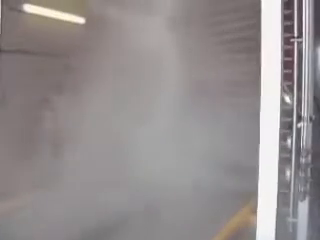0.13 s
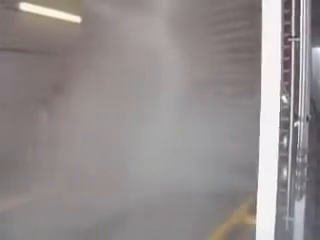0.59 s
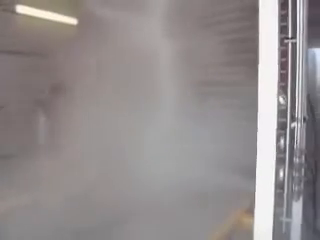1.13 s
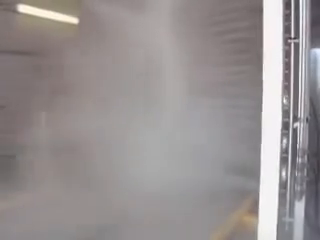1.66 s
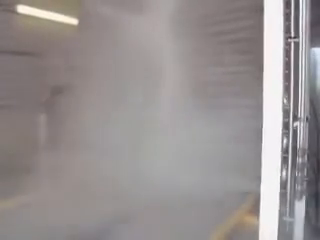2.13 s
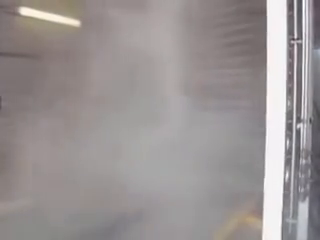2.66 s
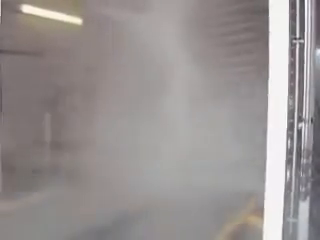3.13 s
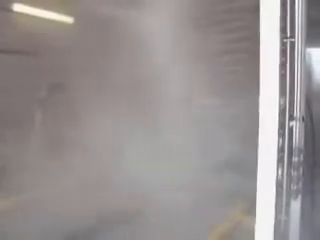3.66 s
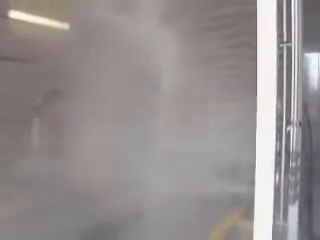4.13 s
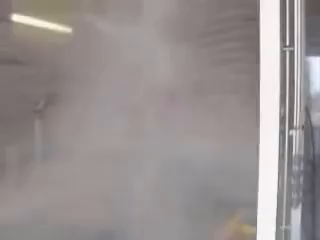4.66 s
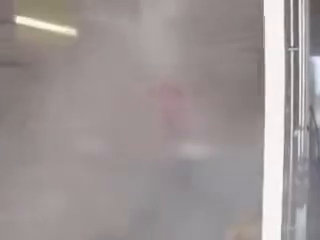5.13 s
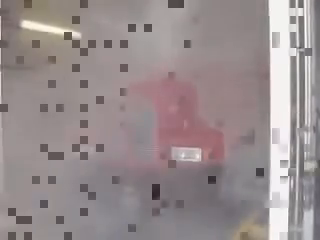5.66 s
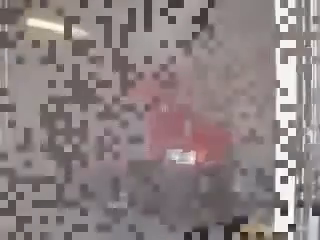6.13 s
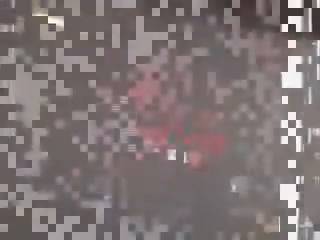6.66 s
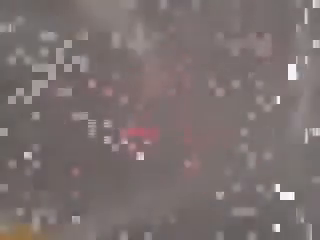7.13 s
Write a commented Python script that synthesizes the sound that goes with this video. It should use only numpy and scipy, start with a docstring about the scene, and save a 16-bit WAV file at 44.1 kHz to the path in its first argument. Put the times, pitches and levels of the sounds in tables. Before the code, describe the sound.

A continuous high-pressure spray runs for about 7.3 seconds in a hard-walled wash bay, already at full strength at the start. Low roar, dense rushing jets and a flickering hiss blend into one broad noise, with small swells around 0.1, 0.3, 1.4 and 3.5 s. Brief spits flare in the hiss, notably near 0.7, 2.7, 3.6 and 6.7 s. Behind it a weak, wavering pump hum of several low tones is clearest from about 1 to 3.5 s, then recedes and nearly vanishes after 6 s. Soft muffled thumps pulse irregularly underneath throughout. From 3 to 5.5 s the spray turns slightly thinner and hissier; after about 5.8 s it eases by a few decibels, with a low swell near 7.1 s, and stops while still spraying. The image is nearly centred, with fleeting wide patches of hiss, slightly smeared mids and a closed-off top.

```python
"""A low roar with hiss above it fills a hard-walled wash bay, where high-pressure nozzles spray a vehicle.
Roar, jets and hiss are noise cut into bands that waver on their own; spits and swells lift parts of it.
A pump hums faintly as a few unsteady tones, and soft low thumps are short bursts of a low tone.
Towards the end the spray eases off. Left and right match, except in brief patches of the hiss."""
import sys
import numpy as np
from scipy import signal
from scipy.fft import rfft, irfft
from scipy.io import wavfile
from scipy.ndimage import uniform_filter1d

SR = 44100
rng = np.random.default_rng(int(sys.argv[2]) if len(sys.argv) > 2 else 0)


def output_pcm(signal):
    """Save a mono or channel-first signal as 16-bit PCM at the path in sys.argv[1].

    Samples are clipped to [-1, 1] before scaling.
    """
    pcm = np.clip(np.atleast_2d(signal).T, -1, 1) * 32767
    wavfile.write(sys.argv[1], SR, np.round(pcm).astype(np.int16))


def elevation(decibels):
    """Turn decibel levels (scalar or array-like) into linear amplitude ratios."""
    levels = np.asarray(decibels, float)
    return 10 ** (levels / 20)


N = 321048  # samples, about 7.28 s


# how strong and how bright the spray is; brighter means more hiss and less deep roar:
# (time [s], jet level [dB], brightness [dB])
SPRAY_COURSE = [(0.0, -20.5, -1), (0.25, -19.5, -2.5), (0.6, -20, -1), (1.2, -20, -1), (1.36, -21, -0.5),
                (1.55, -20, -1), (2.05, -21, 0), (2.6, -20.5, 0), (3.3, -21, 1), (3.7, -21, -0.5),
                (3.9, -21.5, 1), (4.7, -22, 1.5), (5.4, -21.5, 1), (5.68, -21.5, -0.5), (5.85, -22.5, 1),
                (6.1, -23, -0.2), (6.7, -24, -1), (7.28, -23.5, -0.5)]


def spray():
    """Water under pressure: jets, deep roar and hiss rise and fall together."""
    s, jet_db, bright_db = np.transpose(SPRAY_COURSE)
    bright_db = curve(s, bright_db)
    hiss_level = elevation(-6.5 + bright_db)  # against the jets
    sides = np.array([[1], [-1]])  # left and right get opposite signs
    treble = hiss_level * (hiss() + wide_patches() * sides)
    return elevation(curve(s, jet_db)) * (jets() + deep(bright_db) + treble)


# tone of the low spray noise: (frequency [Hz], level per Hz [dB])
ROAR_TONE = [(20, -32.5), (48, -25), (72, -16.5), (84, -9), (100, -4), (200, -3), (290, -1.5), (360, -2),
             (530, -2), (690, 0), (900, -2.5)]


def deep(bright_db):
    """Low rumble and roar of the water in the bay; both yield when the spray turns brighter."""
    rumble = wavering(ROAR_TONE, [20, 90, 180, 280, 400], slow_db=1.4, quick_db=0.6, drops_db=-21.5)
    roar = wavering(ROAR_TONE, [400, 553.5, 719, 902], slow_db=-0.17, quick_db=0.46, drops_db=-16.0)
    # levels against the jets, then dB lost per dB of brightness
    rumble_level = elevation(-6.5 - 0.18 * bright_db)
    roar_level = elevation(-4 - 0.26 * bright_db)
    return rumble_level * rumble + roar_level * roar


# tone of the jets: (frequency [Hz], level per Hz [dB])
JET_TONE = [(900, -1), (1300, -2.5), (1800, -3), (2200, -4.5), (3000, -6), (3950, -7)]


def jets():
    """The rushing middle of the spray: turbulent noise with many drops, in wavering bands."""
    edges_hz = [896.0, 1400, 2000, 2848, 3350, 3996]
    return wavering(JET_TONE, edges_hz, slow_db=0.08, quick_db=.5, drops_db=-10.0)


def wavering(tone, edges_hz, slow_db, quick_db, drops_db):
    """Neighbouring bands of spray, each drifting and fluttering a little on its own; rms 1."""
    total = 0
    for lo, hi in zip(edges_hz[:-1], edges_hz[1:]):
        level_db = swells(np.sqrt(lo * hi)) + slow_db * walk(2.5) + quick_db * walk(25.0)
        total = total + elevation(level_db) * colour(water(drops_db), tone, lo, hi)
    return amp_rms(total)


def water(drops_db):
    """Turbulent jet noise with a dense patter of drops of uneven size."""
    drops_per_s = 2500
    lands = rng.random(N) < drops_per_s / SR
    size_db = 2.67 * rng.exponential(size=N)
    drops = lands * rng.standard_normal(N) * elevation(size_db)
    return rng.standard_normal(N) + elevation(drops_db) * amp_rms(drops)


# swells of the roar and the jets: (time [s], rise [dB], centre [Hz])
SPRAY_SWELLS = [(0.07, 3.5, 262), (0.32, 4.5, 695), (1.35, 2.5, 1400), (1.8, 1.5, 703), (2.72, 0.5, 753),
                (3.45, 2.5, 657), (4.15, 1.5, 299), (4.75, 1.5, 694), (5.6, 1.5, 800), (7.13, 3, 510),
                (7.15, 3.5, 160.5)]


def swells(hz):
    """Rounded rises of the spray level near hz, in dB."""
    half_s, half_octaves = 0.075, 0.61  # distance from the peak to 1/e of the rise
    t = np.arange(N) / SR
    rise_db = np.zeros(N)
    for s, db, centre_hz in SPRAY_SWELLS:
        octaves = np.log2(hz / centre_hz)
        rise_db += db * np.exp(-(octaves / half_octaves) ** 2 - ((t - s) / half_s) ** 2)
    return rise_db


# the hiss comes in steps, each reaching up to the next: (low edge [Hz], level per Hz [dB], flicker [dB])
HISS_STEPS = [(3965, 0, 1.45), (4390, -0.54, 1.4), (5300, 0.5, 0.9), (5500, 1.9, 0.8), (5850, -2, 1.9),
              (6080, -4, 1.5), (6380, -0.5, 1), (7283, -26, 7.5)]
HISS_TOP_HZ = 7580


def hiss():
    """Stepped bands of treble hiss; they flicker together and each alone; rms 1."""
    shared_db, fine, noise = 0.27 * walk(13.0), ripple(), even_noise()
    tops_hz = [row[0] for row in HISS_STEPS[1:]] + [HISS_TOP_HZ]
    total = 0
    for (lo, db, flicker_db), hi in zip(HISS_STEPS, tops_hz):
        level_db = db + spits((lo + hi) / 2) + shared_db + flicker_db * walk(32.0)
        total = total + elevation(level_db) * colour(noise, fine, lo, hi)
    return amp_rms(total)


# spits, brief flares in part of the hiss: (time [s], rise [dB], centre [Hz], half length [s])
HISS_SPITS = [(0.368, 3, 4810, .02), (0.72, 6, 4960, .02), (1.09, 4, 5100, .03), (1.22, 3.5, 5000, .02),
              (1.414, 3.5, 4780, 0.022), (2.03, 3.5, 5900, .025), (2.101, 4, 4820, 0.033),
              (2.288, 1.5, 5000, .017), (2.514, 4.5, 6670, 0.021), (2.747, 7, 5900, .025),
              (3.148, 2.5, 4700, .02), (3.594, 5, 5500, 0.022), (3.699, 5, 4800, 0.11),
              (3.81, 4, 5500, 0.027), (4.647, 5, 4820, .04), (5.573, 5, 5000, .025),
              (5.809, 4.5, 4760, .02), (5.898, 4, 5200, .025), (6.405, 2, 4860, .015), (6.73, 7, 6000, .02),
              (7.08, 3.5, 4890, .025), (7.221, 5.5, 5880, .017)]


def spits(hz):
    """Short rounded rises of the hiss level near hz, in dB."""
    half_width_hz = 700
    t = np.arange(N) / SR
    rise_db = np.zeros(N)
    for s, db, centre_hz, half_s in HISS_SPITS:
        rise_db += db * np.exp(-((hz - centre_hz) / half_width_hz) ** 2 - ((t - s) / half_s) ** 2)
    return rise_db


def even_noise():
    """Smooth noise for the hiss: the strengths of its short narrow slivers are drawn together."""
    size, evenness = 2048, 0.45  # evenness 0: ragged noise, 1: every sliver equally strong
    z = signal.stft(rng.standard_normal(N), nperseg=size)[2]
    evened = z / (abs(z) + 1e-9) ** evenness
    return amp_rms(signal.istft(evened, nperseg=size)[1][:N])


def ripple():
    """A fine, unmoving unevenness of the treble: (frequency [Hz], level [dB]) points."""
    spread_db, spacing_hz = 1.3, 14
    hz = np.arange(HISS_STEPS[0][0] - spacing_hz, HISS_TOP_HZ + spacing_hz, spacing_hz)
    return np.transpose([hz, spread_db * rng.standard_normal(len(hz))])


def wide_patches():
    """Now and then a patch of the hiss turns unlike left and right for a moment."""
    per_s, length_s, level_db = 5.5, .046, -3
    bottom_hz, top_hz = HISS_STEPS[0][0], HISS_STEPS[-1][0]
    out, size = np.zeros(N), int(length_s * SR)
    f = np.fft.rfftfreq(size, 1 / SR)
    fade = np.sin(np.pi * np.arange(size) / size) ** 1.5
    for when, where, width in rng.random((int(per_s * N / SR), 3)):
        lo_hz = 4100 + 2300 * where
        band = (f > lo_hz) & (f < min(lo_hz + 900 + 900 * width, top_hz))
        i = int(when * (N - size))
        out[i:i + size] += fade * irfft(rfft(rng.standard_normal(size)) * band, size)
    # white noise cut to a band: bring it to the level per Hz of the hiss
    return elevation(level_db) * out * np.sqrt(SR / 2 / (top_hz - bottom_hz))


# pump tones: (frequency [Hz], level before load and waver [dB], clear from [s], clear until [s])
PUMP_TONES = [(88.4, -44, -1.5, 3.5), (100.7, -48.5, -0.5, 3.5), (121, -47.5, 0.5, 6),
              (160.6, -47, 2.5, 3.2), (180, -46.5, 1, 3.5), (235.3, -39, 0, 4), (411, -40.5, 3, 3.7),
              (497, -39, 1.4, 2.8)]
# how the load changes all tones: (time [s], level [dB])
LOAD_COURSE = [(0, -4.5), (.9, 1), (2.3, 0), (3.5, -4), (4.3, -3), (5.7, -5), (6.4, -17), (7.28, -17)]


def pump():
    """Weak motor tones that waver, come forward for a while and sink as the load falls."""
    fade_s, faint_db = .2, -8  # how fast a tone comes forward, and how far back it otherwise stays
    t, load_db = np.arange(N) / SR, curve(*np.transpose(LOAD_COURSE))
    total = np.zeros(N)
    for hz, db, s0, s1 in PUMP_TONES:
        forward = (np.tanh((t - s0) / fade_s) - np.tanh((t - s1) / fade_s)) / 2
        level_db = db + load_db + faint_db * (1 - forward) + 1.4 * walk(4.0)
        turns = hz * t + 0.08 * walk(3.0) + rng.random()  # the phase wanders a little
        total += elevation(level_db) * np.sqrt(2) * np.sin(2 * np.pi * turns)
    return total


# loudest thumps: (time [s], peak level [dB], frequency [Hz])
LOUD_THUMPS = [(0.114, -37, 67), (0.243, -36, 67), (0.517, -39, 68), (0.81, -40, 68), (1.457, -42, 68),
               (2.736, -40, 69), (3.304, -38, 67), (3.815, -38, 68), (4.262, -35, 67), (5.359, -37, 55),
               (5.453, -37, 68), (5.638, -37, 68), (5.858, -36, 55), (6.142, -38, 60), (6.699, -40, 53),
               (7.255, -41, 60)]


def thumps():
    """Soft low thumps, the fainter ones at random: a few cycles under a rounded envelope."""
    half_s, soft_count = 0.024, 15
    t, out = np.arange(N) / SR, np.zeros(N)
    # soft ones: any time, -47.5 dB give or take 2, at 68 Hz
    soft = [(when * N / SR, -47.5 + 2 * (2 * size - 1), 68) for when, size in rng.random((soft_count, 2))]
    for (s, db, hz), turn in zip(LOUD_THUMPS + soft, rng.random(len(LOUD_THUMPS) + soft_count)):
        i = slice(max(int((s - 4 * half_s) * SR), 0), int((s + 4 * half_s) * SR))
        envelope = np.exp(-((t[i] - s) / half_s) ** 2)
        out[i] += elevation(db) * envelope * np.sin(2 * np.pi * (hz * t[i] + turn))
    return out


def amp_rms(x):
    """Scale to rms 1."""
    return x / np.sqrt(np.mean(x ** 2))


def curve(s, v):
    """A control joined by straight lines in time."""
    return np.interp(np.arange(N) / SR, s, v)


def colour(x, tone, lo_hz, hi_hz):
    """Shape x by (frequency [Hz], level [dB]) points and keep only lo-hi."""
    f = np.maximum(np.fft.rfftfreq(N, 1 / SR), 1)
    hz, db = np.transpose(tone)
    gain = elevation(np.interp(np.log(f), np.log(hz), db))
    return irfft(rfft(x) * gain * (f >= lo_hz) * (f < hi_hz), N)


def walk(rate):
    """Random levels held 1 / rate s and smoothed twice; spread 1."""
    k = int(SR / rate)
    held = np.repeat(rng.standard_normal(N // k + 1), k)
    w = uniform_filter1d(uniform_filter1d(held, k), k)[:N]
    return w / w.std()


def scene():
    """Spray in front, with the pump and the thumps behind it."""
    return spray() + pump() + thumps()


# slivers weaker than this are muted: (frequency [Hz], level against the mean bin of the span [dB])
MUTE_BELOW = [(700, -5), (1500, -4.5), (2500, -5.5), (4000, -7.5)]


def mute_weak_slivers(x):
    """Narrow slivers under a threshold are muted, leaving brief dips between 700 and 4000 Hz."""
    size, mute_db, soft_db = 2560, -16, 1.0
    follow = 0.89  # share of the slow level that the threshold follows
    f, _, z = signal.stft(x, SR, nperseg=size, noverlap=size * 3 // 4)
    hz, under_db = np.transpose(MUTE_BELOW)
    span = (f > hz[0]) & (f < hz[-1])
    # smooth the power over neighbouring frequencies, then over time
    power = uniform_filter1d(uniform_filter1d(abs(z) ** 2, size=3, axis=-2), size=4, axis=-1)
    slow = uniform_filter1d(power[:, span].mean(axis=(0, 1)), size=50)
    norm = slow ** follow * slow.mean() ** (1 - follow)
    over_db = 10 * np.log10(power / norm + 1e-12) - np.interp(f, hz, under_db)[:, None]
    muted = span[:, None] * (1 - np.tanh(over_db / soft_db)) / 2  # 0 open, 1 fully muted
    return signal.istft(z * elevation(mute_db * muted), SR, nperseg=size, noverlap=size * 3 // 4)[1][:, :N]


def roll_off(x):
    """The treble ends steeply here."""
    return signal.sosfilt(signal.butter(12, 7940, fs=SR, output="sos"), x)


def record(dry):
    """The finished mix, with its weakest narrow slivers muted."""
    mix = mute_weak_slivers(dry)
    return roll_off(mix)


dry = scene()
out = record(dry)
output_pcm(out)
```